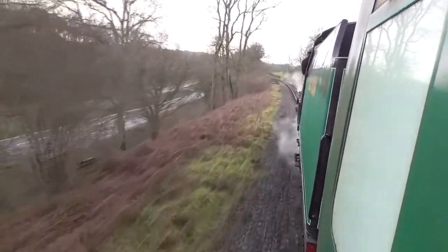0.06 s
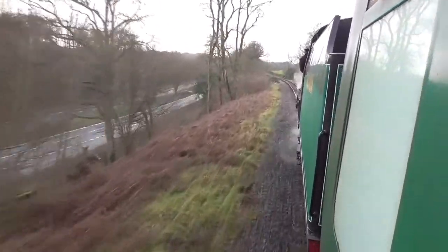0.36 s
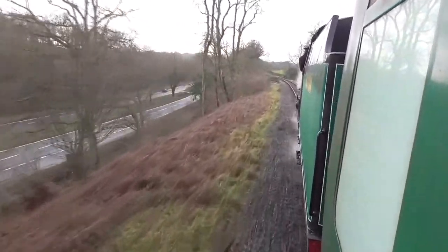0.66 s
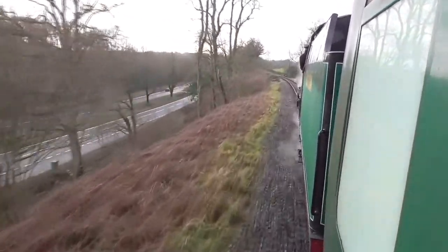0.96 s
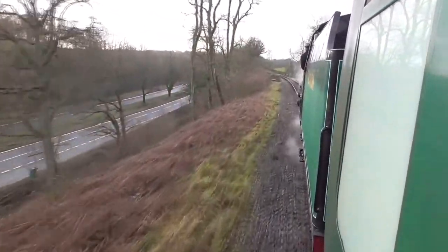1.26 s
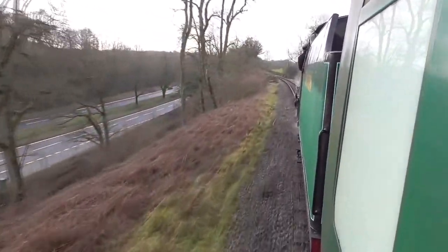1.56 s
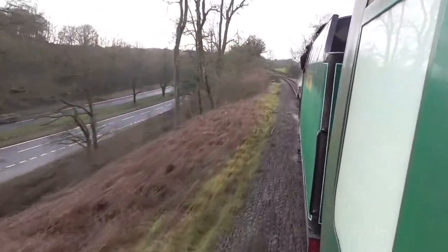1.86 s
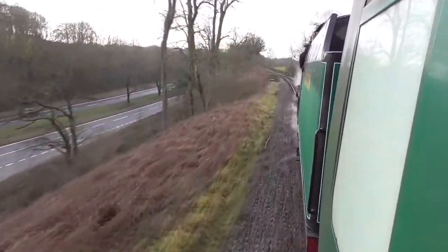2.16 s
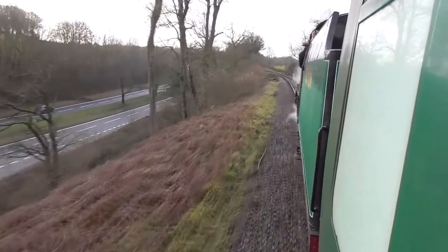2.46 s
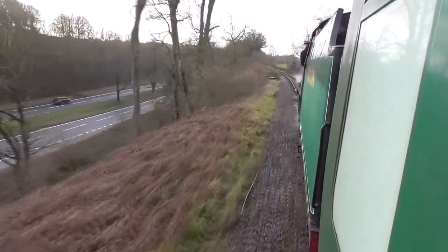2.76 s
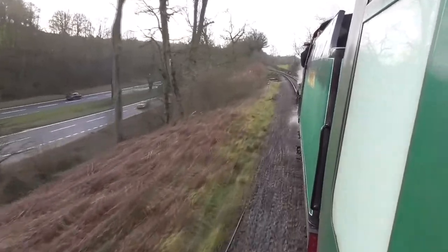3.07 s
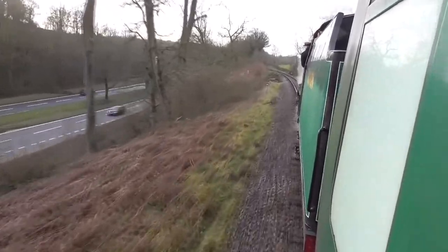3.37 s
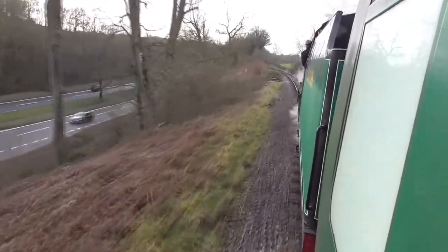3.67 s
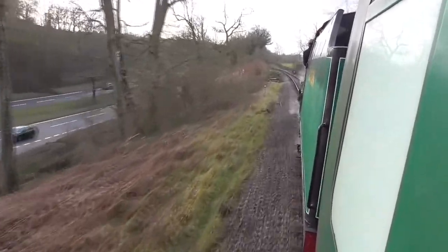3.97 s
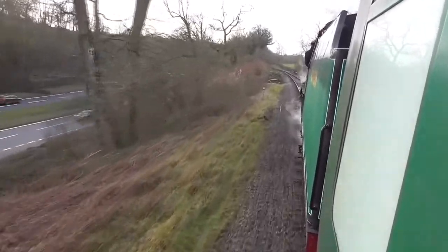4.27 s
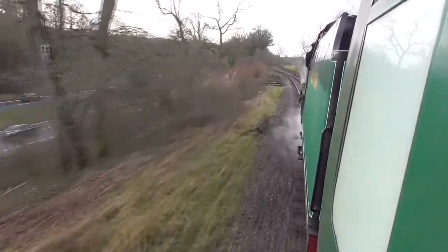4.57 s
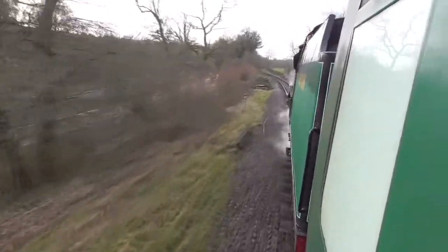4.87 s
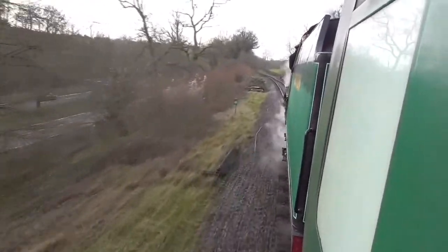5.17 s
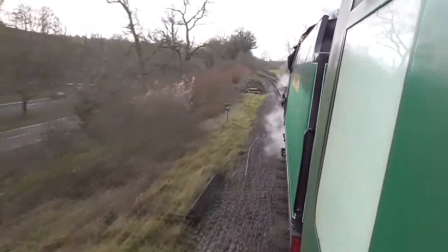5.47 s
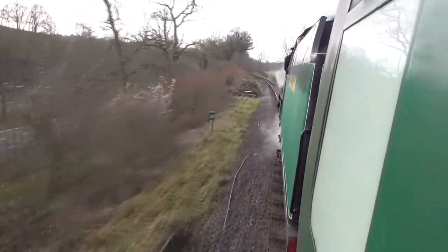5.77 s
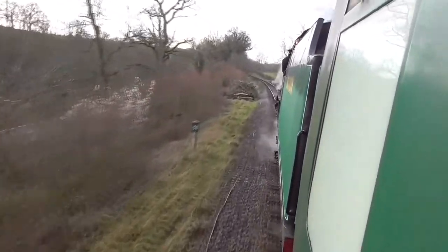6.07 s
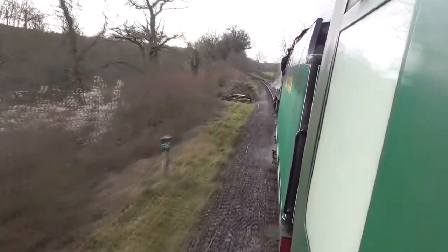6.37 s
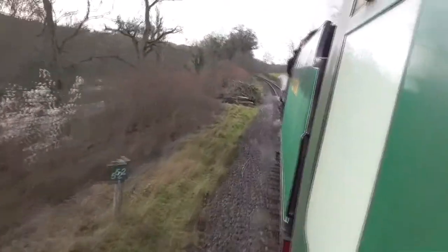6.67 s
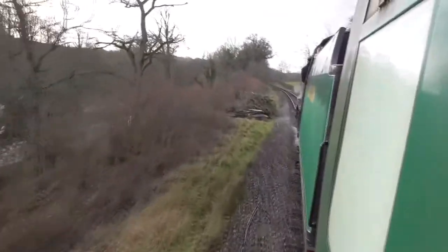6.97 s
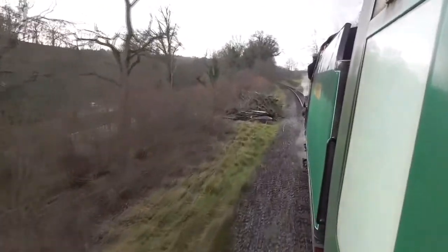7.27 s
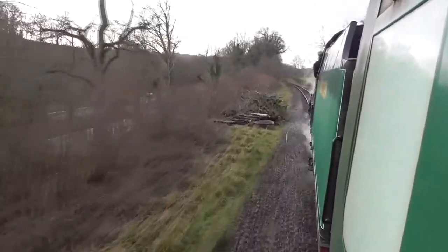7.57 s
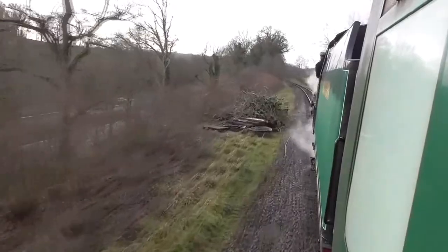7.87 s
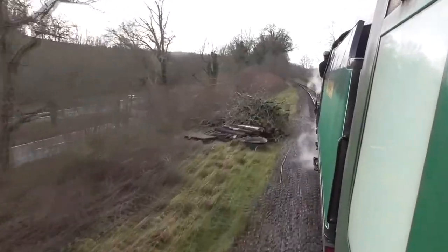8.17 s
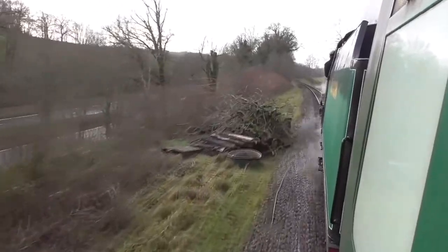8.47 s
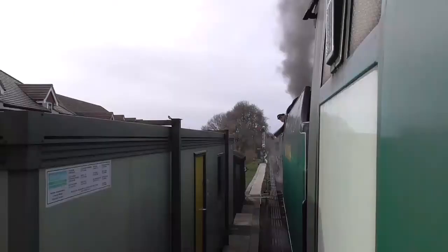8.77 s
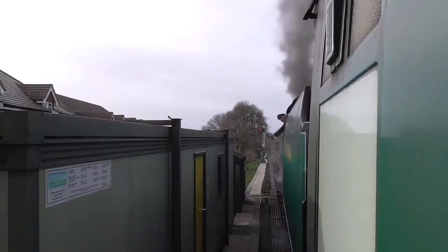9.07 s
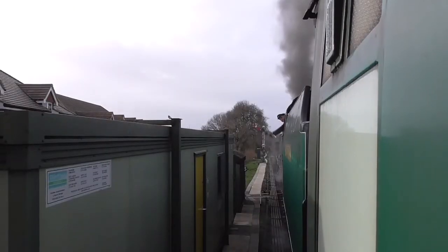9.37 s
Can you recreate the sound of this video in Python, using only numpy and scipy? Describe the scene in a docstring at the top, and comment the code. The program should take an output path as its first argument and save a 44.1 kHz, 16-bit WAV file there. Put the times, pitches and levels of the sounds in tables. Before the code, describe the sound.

At the open window of a moving steam train, rushing air roars and thumps against the microphone, now and then tearing past with a bright rasp. The locomotive's quieter hiss pulses quickly underneath, and a few metal squeaks and clanks gather late in the ride. Everything stops suddenly, and half a second later escaping steam hisses steadily with a held whistle tone.

```python
"""Wind and steam from a train window

Behind a running steam locomotive, the rushing air buffets a microphone held out of a carriage window.
Steam hisses from the cylinders in time with the exhaust beat, and the wheels and rods squeak and clank.
The ride breaks off. After a short silence a steady jet of steam starts, with a whistle note in it."""
import sys
import numpy as np
from scipy import signal
from scipy.fft import irfft, next_fast_len
from scipy.io import wavfile
from scipy.ndimage import uniform_filter1d

SR = 44100
rng = np.random.default_rng(int(sys.argv[2]) if len(sys.argv) > 2 else 0)


def bounce(signal):
    """Save signal as a 16-bit WAV file at the path given by the first command-line argument."""
    frames = np.transpose(np.atleast_2d(signal))
    limited = np.clip(frames, -1, 1)
    pcm = np.round(limited * 32767).astype(np.int16)
    wavfile.write(sys.argv[1], SR, pcm)


N = 415422
TIME, FREQ = np.arange(N) / SR, np.fft.rfftfreq(2 * next_fast_len(N // 2 + 1), 1 / SR)

# How strong each noise is from low to high pitch: (frequency [Hz], relative level [dB])
WIND_COLOUR = [(20, -28), (50, -17.5), (100, -6), (180, -0.5), (230, 1.5), (320, -3), (480, -9), (800, -14),
               (1300, -22.5), (1550, -29), (1780, -44), (2150, -41.5), (2800, -51.5), (5000, -59)]  # the wind's deep rush
FIZZ_COLOUR = [(1000, -11.5), (2000, 4.5), (2800, -1), (3700, 2.5), (4700, 0), (6000, -8), (8000, -5),
               (10000, -6), (12500, -18.5), (16000, -36)]  # its finest swirls
RASP_COLOUR = [(2000, -19.5), (4000, 4), (5500, 1), (8000, 0.5), (10000, -4.5), (13000, -10),
               (16000, -25.5)]  # air tearing past the microphone
CYLINDER_COLOUR = [(1200, 9), (2000, 4), (2900, -4.5), (4000, -8.5), (5900, -9.5), (7200, -1.5),
                   (8700, 2.5), (10300, 2), (11900, 4), (13000, -3.5), (14300, -7.5), (15700, -19.5)]  # steam leaving the cylinders
CLANK_BODY_COLOUR = [(200, -5.5), (400, 9), (900, 3), (1400, -5), (1900, -7), (2600, -21), (4000, -17),
                     (6000, -31)]  # the low part of a clank
CLANK_RATTLE_COLOUR = [(1500, -6.5), (3500, -11), (5800, -7), (7600, 2), (9500, -1.5), (12000, -4),
                       (16000, -31)]  # the bright part of a clank
JET_COLOUR = [(80, -13.5), (250, -11), (1000, 2.5), (1600, -4), (2300, 1.5), (3500, -12), (4500, -3.5),
              (5900, -12), (7400, 2.5), (9000, -6), (11700, -4), (13500, -10), (16000, -24)]  # the steady jet of steam

# One spell of low drumming: (start [s], length [s], pitch [Hz], band width [Hz], level [dB])
DRUMMING = (7.5, 0.4, 185, 50, -23.5)
# Brief pitched swells in the wind's rush: (start [s], length [s], pitch [Hz], level [dB])
WIND_RINGS = [(6.867, 0.051, 880, -26.5), (7.914, 0.034, 560, -16.5)]
# Steel rubbing on steel: (start [s], length [s], pitch [Hz], level [dB], wobble [share of pitch])
SQUEAKS = [(.45, .07, 11600, -41, .025), (1.245, 0.041, 8100, -43, .012), (1.418, 0.045, 8980, -42, .012),
           (1.43, 0.055, 6810, -42.5, .015), (1.44, .035, 11520, -39, 0.013), (2.195, .05, 7720, -44, .008),
           (8.15, 0.42, 3240, -50, 0.047), (8.33, 0.2, 6900, -51.5, .02), (8.48, .05, 3620, -43, .015),
           (8.558, 0.23, 3970, -43.5, .07), (8.693, 0.037, 3280, -37, .002),
           (8.71, 0.091, 7900, -43, 0.025)]
# Loose parts clanking: (start [s], length [s], body level [dB], rattle level [dB])
CLANKS = [(2.186, 0.035, -40, -35), (4.828, 0.037, -26.5, -36), (8.353, 0.023, -30.5, -39),
          (8.531, 0.023, -19, -31), (8.772, 0.032, -17.5, -35)]
# Slow changes in the steam escaping at the cylinders: (time [s], relative level [dB])
CYLINDER_FLOW = [(0, -42), (.5, -43.5), (1.75, -47), (2.17, -41.5), (2.55, -48.5), (3.08, -40.5),
                 (3.17, -37.5), (3.36, -38.5), (3.5, -45), (3.8, -49.5), (3.9, -43), (4.7, -50), (5.1, -43),
                 (5.95, -47), (6.6, -41.5), (7.08, -46), (7.35, -39.5), (8.45, -36), (8.76, -39)]
# How wide the jet sounds: (frequency [Hz], side level over middle level [dB])
JET_WIDTH = [(200, -10), (500, -14), (1200, -3), (2400, -8), (4400, -6), (7000, -7), (9000, 0), (12000, -1),
             (15000, 2)]
# The whistle's tones, plus faint narrow peaks in the jet's high hiss: (pitch [Hz], level [dB])
JET_TONES = [(376.8, -35.5), (660, -43), (942.1, -42.5), (1264, -41), (1830, -47), (2250, -42), (2449, -52),
             (2702, -50), (2929, -42), (4549, -45), (7005, -43), (7504, -39), (11816, -41)]
# Big swirls of air hitting the microphone: (start [s], relative level [dB], rush over thump [dB])
EDDIES = [(0.15, -4, -21), (0.663, -2, -4.5), (1.041, -3, -10), (1.195, -5.5, -8), (1.258, -7, -3),
          (1.439, -7.5, -19.5), (1.597, -8, -5), (1.936, -6.5, -11), (2.139, -0.5, -14.5),
          (2.371, -3.5, -10), (2.484, -2.5, -7.5), (2.951, -6, -18), (3.295, -6.5, -15.5),
          (3.413, -6, -3.5), (3.469, -6.5, -1), (3.984, 0, -27.5), (4.065, -2, -10), (4.294, -4.5, -13.5),
          (4.451, -0.5, -4.5), (4.914, -1, -11.5), (5.241, -6, -3.5), (5.354, -2, -8), (5.787, -5, -11),
          (5.937, -11.5, 2.5), (7.003, -8.5, -4), (7.07, -10, -10), (7.899, -3.5, -21),
          (7.926, -2.5, -10.5), (8.418, -1.5, -12)]
# Slow changes in the airflow at the window: (time [s], relative level [dB])
AIRFLOW = [(0.0, 1.55), (1.7, 1.2), (2.4, 0.6), (3.0, 0.2), (3.15, 2), (3.55, 2), (3.76, -1.5), (4.4, 1.1),
           (4.82, -2.5), (5.15, -0.5), (6.2, 0.5), (6.6, -0.3), (7.22, 0), (7.35, 2), (8.1, 2.3),
           (8.76, 0.2)]
# Gusts on top of that flow: (start [s], length [s], change in flow [dB], extra roar [dB])
GUSTS = [(0.018, 0.27, 1.5, 0), (0.625, .07, 0.5, 3), (1.03, 0.31, 1, 0), (1.411, 0.091, 3.5, -2),
         (2.05, 0.19, 2.5, -0.5), (2.36, 0.27, 2.5, -1.5), (2.67, .13, 2, 0), (3.237, 0.3, 1.5, 0.5),
         (3.602, 0.095, 5.5, -3), (3.976, 0.034, 3, 0), (4.114, .15, 2.5, 1.5), (4.287, .23, 2.5, 2.5),
         (4.519, .23, 4.5, 0), (5.01, 0.033, 4.5, -.5), (5.24, 0.13, 2, 1), (5.413, 0.22, 2.3, -1),
         (5.771, 0.056, 2.5, -0.5), (5.905, 0.19, 2.5, -.5), (6.537, 0.28, 2, 1), (6.889, 0.042, 3.5, -0.5),
         (6.982, 0.028, 3.5, 0), (7.541, 0.24, 0, 2), (8.206, .368, 2, 0)]
# Lulls, when the flow lets go of the microphone: (start [s], length [s], change in flow [dB])
LULLS = [(0.973, 0.061, -3), (1.374, 0.04, -3.5), (1.868, 0.062, -2.5), (2.9, 0.07, -2), (4.266, .03, -3),
         (6.093, .068, -3), (6.228, 0.12, -3), (7.022, 0.036, -2.5)]
# Moments when the wind tears past with a bright rasp: (start [s], length [s], level [dB])
RASPS = [(2.36, 0.037, -43), (2.483, 0.055, -66), (4.114, 0.17, -42.5), (4.293, 0.11, -36),
         (4.433, 0.046, -34), (4.552, 0.096, -39), (4.655, 0.11, -43.5), (5.247, 0.043, -45),
         (5.45, 0.052, -41), (5.932, 0.031, -45), (6.037, .03, -46)]


def gain_of(db):
    """Turns decibels into a number to multiply a sound by."""
    return 10 ** (np.asarray(db) / 20)


def evened(x):
    """Scales a signal so that its average size (rms) is 1."""
    return x / np.sqrt(np.mean(x ** 2) + 1e-20)


def colour(points):
    """Turns a colour table into a gain for every frequency."""
    hz, db = np.transpose(points)
    return gain_of(np.interp(np.log(FREQ + 1), np.log(hz + 1), db))


def curve(points):
    """Joins (time, level) points with straight lines."""
    times, levels = np.transpose(points)
    return np.interp(TIME, times, levels)


def noise(gains):
    """Noise of size 1, shaped by a gain for every frequency."""
    real, imaginary = rng.standard_normal((2, len(FREQ)))
    return evened(irfft(gains * (real + 1j * imaginary))[:N])


def flutter(slow_hz, fast_hz):
    """Random wavering of size 1 between two rates, stronger at the slow end."""
    return noise((FREQ > slow_hz) / np.sqrt(FREQ + 1) / (1 + (FREQ / fast_hz) ** 4))


def add(mix, start, sound):
    """Mixes a sound in at a start time in seconds."""
    part = mix[max(round(start * SR), 0):][:len(sound)]
    part += sound[:len(part)]


def swell(start, length, roundness=1):
    """A rise to 1 and a fall back to 0; less roundness gives a flatter top."""
    progress, out = np.linspace(0, 1, round(length * SR)), np.zeros(N)
    add(out, start, (4 * progress * (1 - progress)) ** roundness)
    return out


def tone(cycles):
    """A pure tone of size 1, from a running count of its cycles."""
    return np.sqrt(2) * np.sin(2 * np.pi * cycles)


def drumming():
    """The wind beside the carriage briefly drums around one low pitch."""
    start, length, hz, width_hz, db = DRUMMING
    resonance = 1 / (1 + (2 * (FREQ - hz) / width_hz) ** 2)
    return gain_of(db) * swell(start, length, roundness=.6) * noise(resonance)


def wind_rings(wobble=0.016):
    """Brief swells in the wind's rush, each with a wavering pitch."""
    drift = np.cumsum(flutter(20, 200)) / SR
    return sum(gain_of(db) * swell(start, length, roundness=2.5) * tone(hz * (TIME + wobble * drift))
               for start, length, hz, db in WIND_RINGS)


def running_gear(grit_db=4):
    """Steel sticks and slips in unsteady squeaks; loose parts clank and rattle."""
    out = np.zeros(N)
    drift = np.cumsum(flutter(12, 284)) / SR
    grit = evened(gain_of(grit_db * flutter(60, 600)))
    for start, length, hz, db, wobble in SQUEAKS:
        out += gain_of(db) * grit * swell(start, length) * tone(hz * (TIME + wobble * drift))
    body, rattle = noise(colour(CLANK_BODY_COLOUR)), noise(colour(CLANK_RATTLE_COLOUR))
    for start, length, body_db, rattle_db in CLANKS:
        out += swell(start, length) * (gain_of(body_db) * body + gain_of(rattle_db) * rattle)
    return out


def cylinders(beat_hz=10.51, slowing_hz_per_s=.015, first_beat_s=.022,
              beat_db=1.96, flicker_db=1.07, boost_db=3):
    """Steam hiss swells with every stroke of the pistons as the engine slowly loses speed."""
    strokes = np.cumsum(beat_hz - slowing_hz_per_s * TIME) / SR - beat_hz * first_beat_s
    pulsing = evened(gain_of(beat_db * np.cos(2 * np.pi * strokes) + flicker_db * flutter(2.7, 60)))
    return noise(colour(CYLINDER_COLOUR)) * pulsing * gain_of(curve(CYLINDER_FLOW) + boost_db)


def steam_jet(start_s=9.353, rise_s=0.014, hiss_db=-27):
    """Escaping steam makes a wide, steady hiss with a whistle and a few faint high peaks in it."""
    middle_colour = colour(JET_COLOUR)
    side_colour = middle_colour * colour(JET_WIDTH)
    middle = noise(middle_colour)
    side = noise(side_colour) * np.linalg.norm(side_colour) / np.linalg.norm(middle_colour)
    hiss = gain_of(hiss_db) * np.array([middle + side, middle - side])  # left ear, right ear
    tones = sum(gain_of(db) * tone(hz * TIME + rng.random()) for hz, db in JET_TONES)
    return (hiss + tones) * np.clip((TIME - start_s) / rise_s, 0, 1)


def wind_bands(split_hz=420):
    """Shares the wind's colour between large swirls (low sound) and small ones (higher sound)."""
    wind = colour(WIND_COLOUR)
    small_share = 1 / (1 + (split_hz / (FREQ + 1)) ** 6)
    return wind * np.sqrt(1 - small_share), wind * np.sqrt(small_share)


def eddies(rise_s=0.0059, trim_db=-8, thump_hz=225, thump_width_hz=130, fizz_db=-21):
    """Each big swirl is a quick push of air that drains away: a low thump and a fizzy rush."""
    t, out = np.arange(0, .06, 1 / SR), np.zeros(N)
    push = t / rise_s * np.exp(1 - t / rise_s)
    push_size = np.sqrt(np.mean(push ** 2))
    large, small = wind_bands()
    low = noise(large / np.hypot(1, 2 * (FREQ - thump_hz) / thump_width_hz))
    high = noise(small) + gain_of(fizz_db) * noise(colour(FIZZ_COLOUR))
    for start, db, rush_db in EDDIES:
        thump, rush = (evened(band[round(start * SR):][:len(t)] * push) for band in (low, high))
        add(out, start, gain_of(db + trim_db) * push_size * (thump + gain_of(rush_db) * rush))
    return out


def jolts(per_s=110, drain_s=0.011):
    """Random jolts in the wind that strike at once and drain away, scaled to size 1."""
    hits = (rng.random(N) < per_s / SR) * 1.
    softened = uniform_filter1d(hits, size=60)
    draining = signal.lfilter([1], [1, -np.exp(-1 / (drain_s * SR))], softened)
    return evened(draining - draining.mean())


def airflow(roundness=0.1):
    """The flow's strength and extra roar in dB; gusts and lulls start fast, hold and end fast."""
    flow_db = curve(AIRFLOW) + sum(db * swell(start, length, roundness) for start, length, db in LULLS)
    extra_roar_db = np.zeros(N)
    for start, length, db, roar_db in GUSTS:
        gust = swell(start, length, roundness)
        flow_db += db * gust
        extra_roar_db += roar_db * gust
    return flow_db, extra_roar_db


def slipstream(buffet_db=-21, roar_db=-26, fizz_db=-45):
    """Air rushing past the train shakes swirls of all sizes together; the finest surge and crackle."""
    large, small = wind_bands()
    flow_db, extra_roar_db = airflow()
    shake = evened(flutter(12, 77) + 0.84 * jolts())
    crackle, surge = flutter(70, 500), flutter(2.1, 16)
    # Each multiplier sets how many dB that wavering moves the layer.
    buffet = noise(large) * evened(gain_of(1.5 * shake))
    roar = noise(small) * evened(gain_of(1.41 * shake + 0.54 * crackle))
    fizz = noise(colour(FIZZ_COLOUR)) * evened(gain_of(2 * shake + 0.54 * crackle + 1.13 * surge))
    rasp = noise(colour(RASP_COLOUR)) * evened(gain_of(2.5 * (shake + crackle)))
    tearing = sum(gain_of(db) * swell(start, length, roundness=0.376) for start, length, db in RASPS)
    # Roar and fizz grow faster than the buffeting, so a stronger flow sounds brighter.
    return (buffet * gain_of(flow_db + buffet_db)
            + roar * gain_of(1.25 * flow_db + extra_roar_db + roar_db)
            + fizz * gain_of(1.33 * flow_db + fizz_db)
            + rasp * tearing)


def scene(ride_ends_s=8.795, fade_s=0.0038):
    """The ride, alike in both ears; a sudden stop to silence; then the wide jet."""
    ride = slipstream() + drumming() + eddies() + cylinders() + running_gear() + wind_rings()
    cut_off = np.exp(-np.maximum(TIME - ride_ends_s, 0) / fade_s)
    return ride * cut_off + steam_jet()


def record(dry, low_cut_hz=30, high_cut_hz=14800, top_edge_hz=15720, ceiling=.92):
    """The microphone loses the deepest rumble and highest hiss, and softly overloads on big thumps."""
    band = signal.butter(2, [low_cut_hz, high_cut_hz], "bandpass", fs=SR, output="sos")
    filtered = signal.sosfilt(band, dry)
    squashed = filtered / (1 + (filtered / ceiling) ** 6) ** (1 / 6)
    steep_treble_cut = signal.firwin(1023, top_edge_hz, window=("kaiser", 9), fs=SR)
    return signal.oaconvolve(squashed, steep_treble_cut[None], "same")


dry = scene()
out = record(dry)
bounce(out)
```